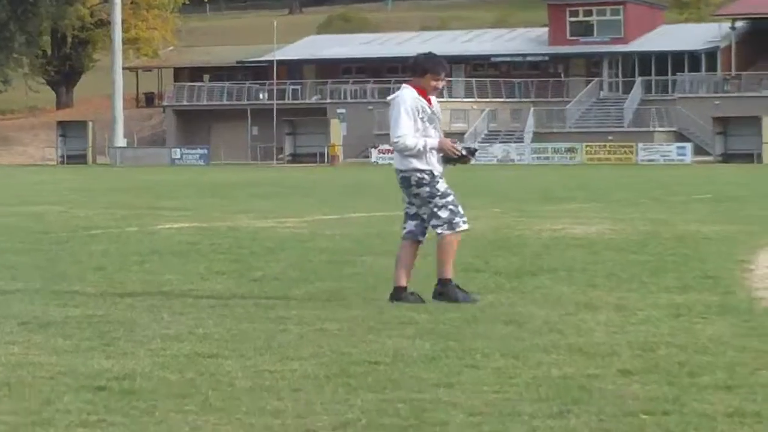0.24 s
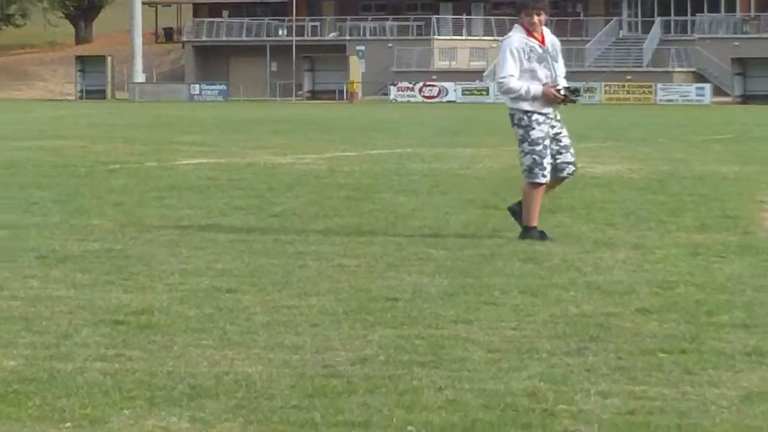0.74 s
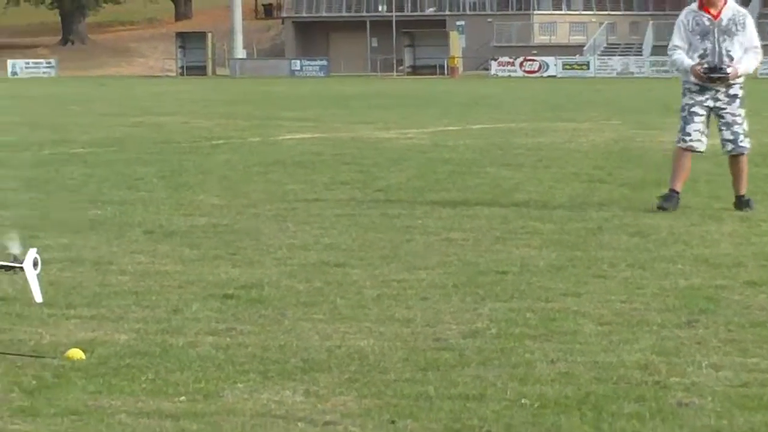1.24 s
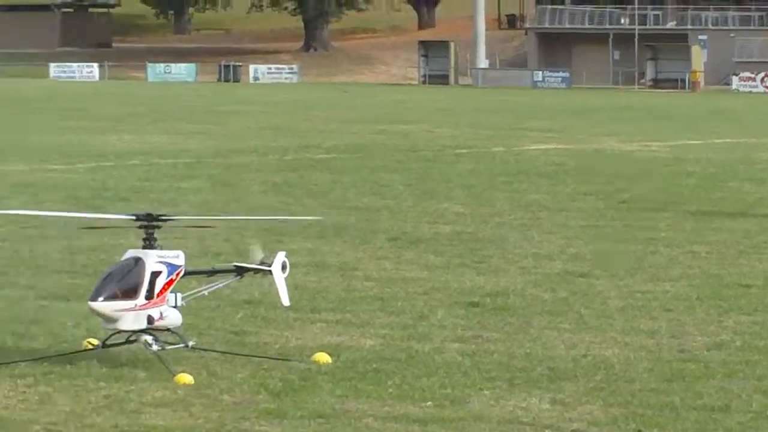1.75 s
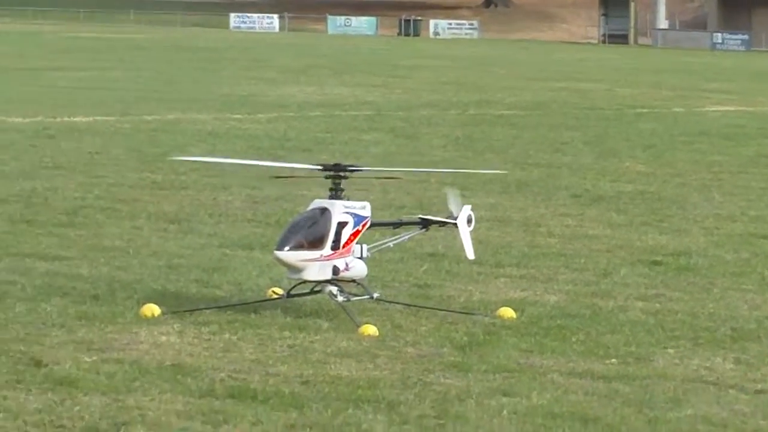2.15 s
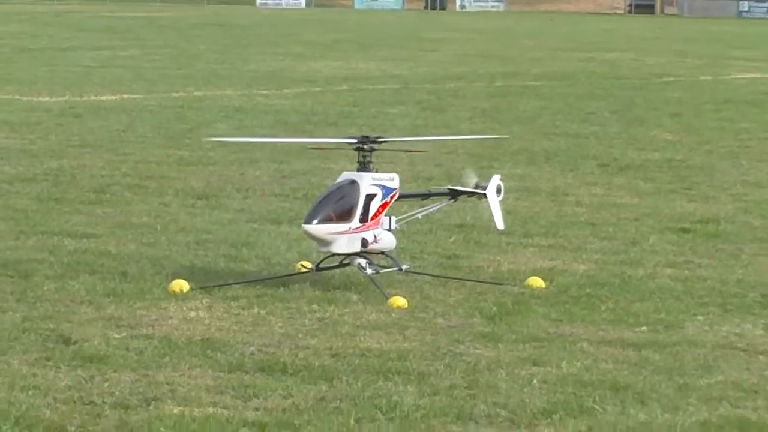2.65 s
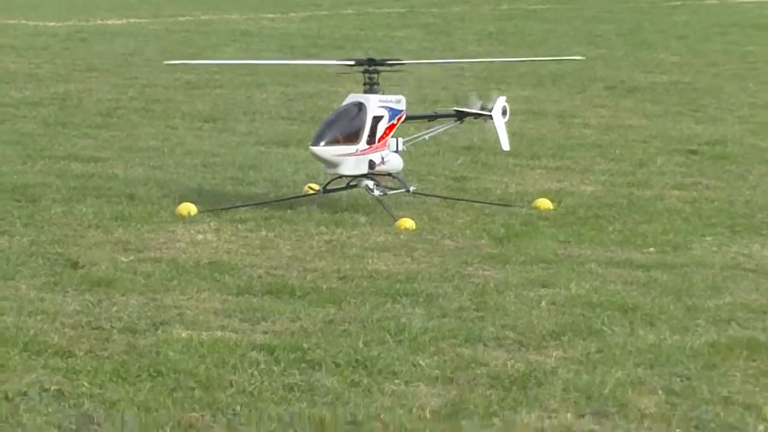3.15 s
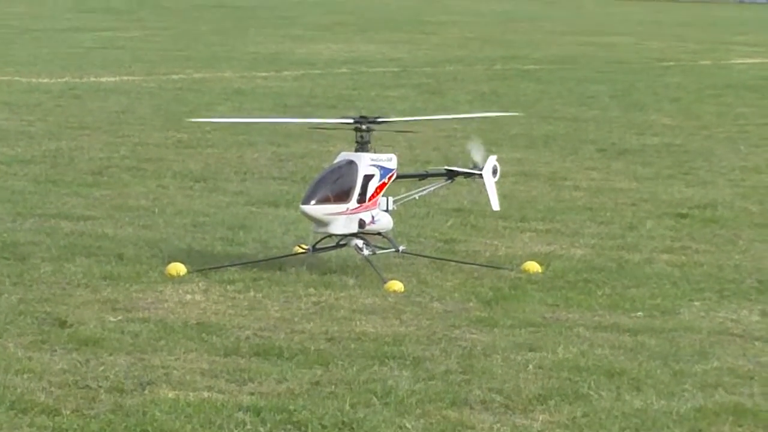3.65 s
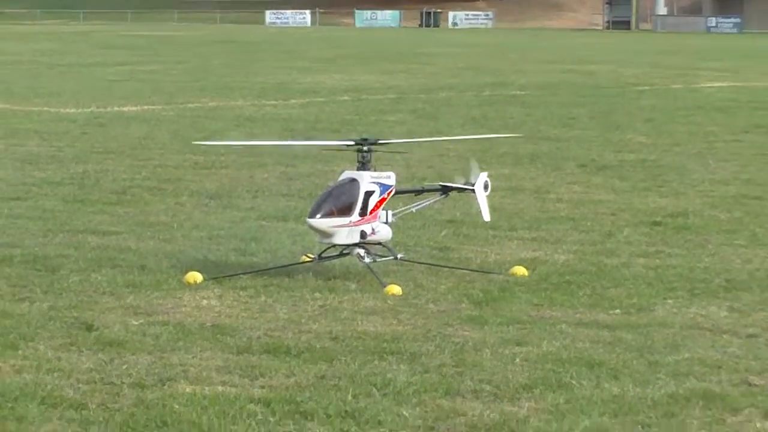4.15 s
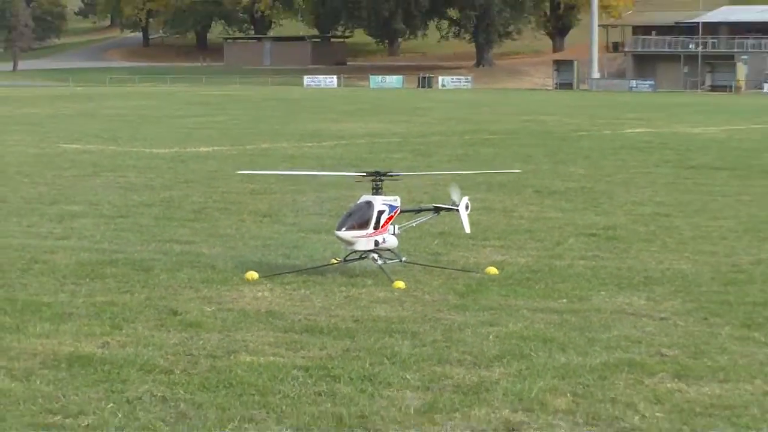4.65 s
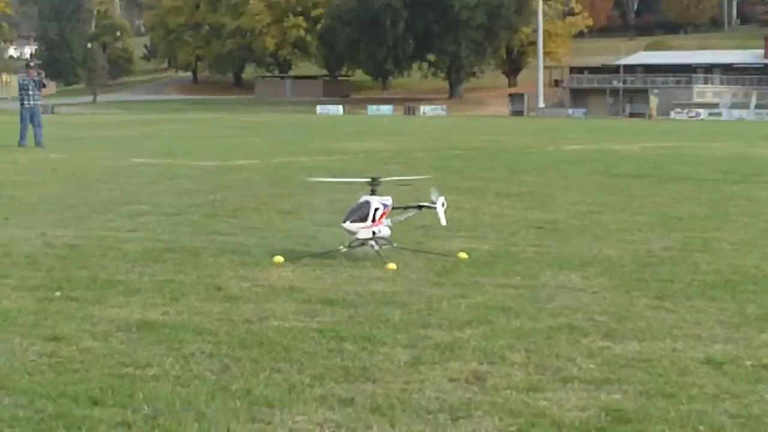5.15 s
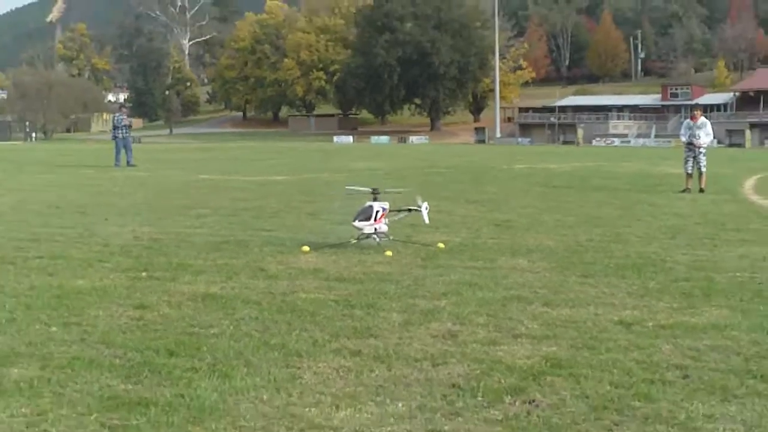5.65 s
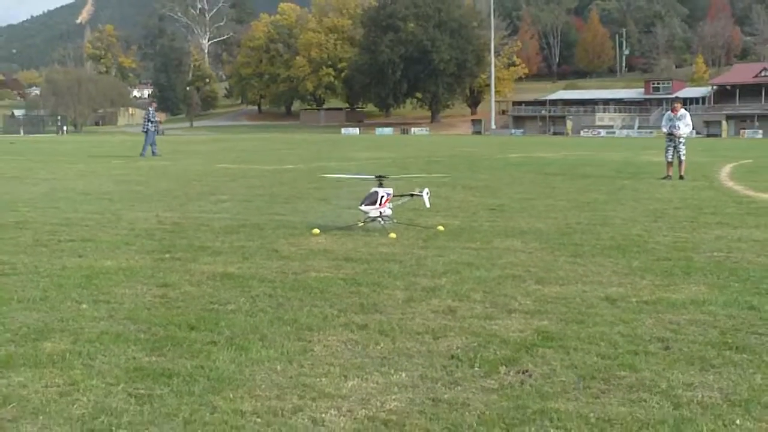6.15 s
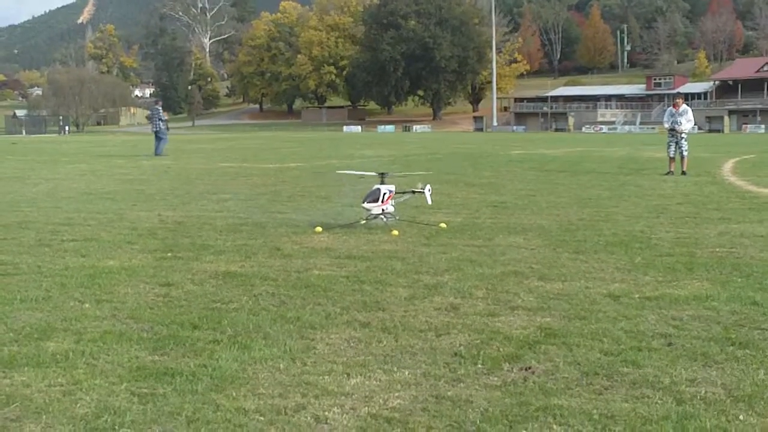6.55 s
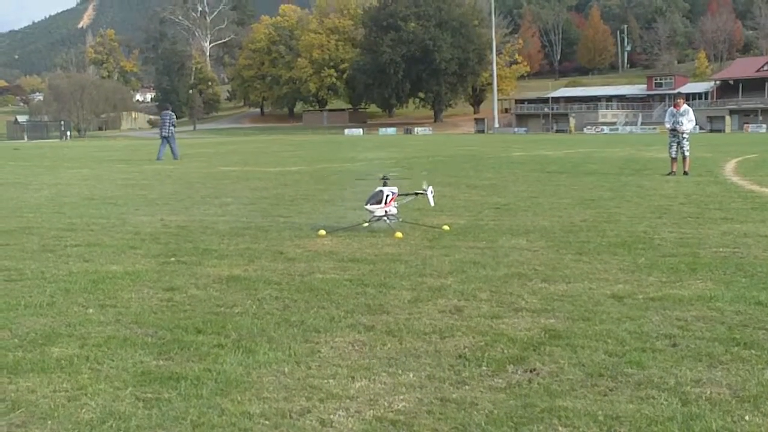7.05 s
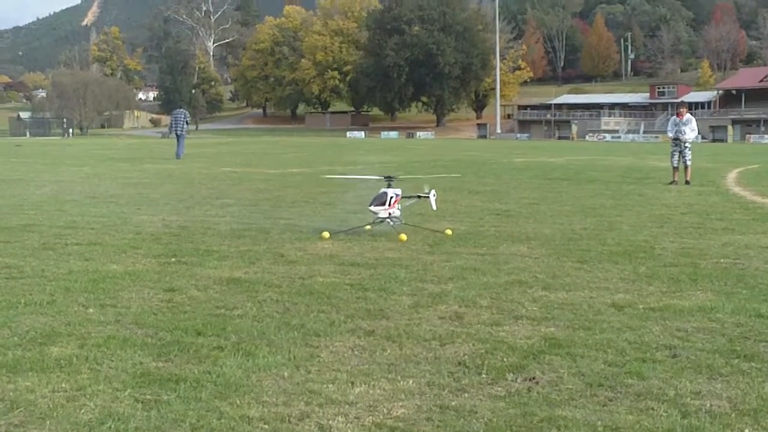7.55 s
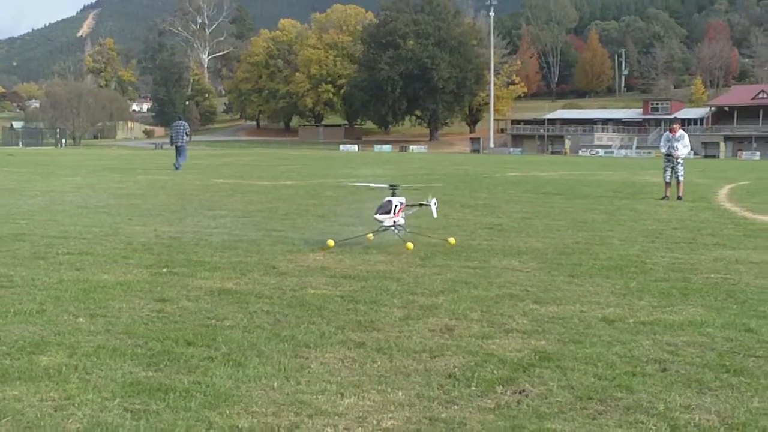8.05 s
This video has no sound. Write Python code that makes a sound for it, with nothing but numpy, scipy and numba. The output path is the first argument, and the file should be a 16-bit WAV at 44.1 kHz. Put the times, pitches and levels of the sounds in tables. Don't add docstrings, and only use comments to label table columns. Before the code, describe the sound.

Steady airy rotor hiss and fluttering blade swishes, about thirty-six a second, cover a thin two-stroke whine. Soft shoe scuffs come first, with tiny grass ticks around three seconds and a very faint distant bird note near four. The engine then gathers speed, a sharp twig snap pops late, and the whine keeps climbing. Dry outdoor field, close mono sound, narrow treble and slightly grainy compression.

```python
import sys
import numpy as np
from scipy import signal
from scipy.fft import rfft, irfft
from scipy.io import wavfile
from scipy.ndimage import uniform_filter1d, map_coordinates
from numba import njit

SR = 44100
rng = np.random.default_rng(int(sys.argv[2]) if len(sys.argv) > 2 else 0)


def to_linear_factor(level_db):
    exponent = np.asarray(level_db, float) / 20
    return 10 ** exponent


def unload_wav(signal):
    wavfile.write(
        sys.argv[1],
        SR,
        np.round(np.clip(np.atleast_2d(signal).T, -1, 1) * 32767).astype(np.int16),
    )


N = 366030
T = np.arange(N) / SR
F = np.arange(N // 2 + 1) * SR / N + 1


def curves(table):
    s, *columns = np.transpose(table)
    return [np.interp(T, s, c) for c in columns]


def unit(x):
    return x / np.sqrt(np.mean(x ** 2))


def walk(rate_hz):
    k = max(int(SR / 32 / rate_hz), 1)
    coarse = rng.standard_normal(N // 32 + 2)
    coarse = uniform_filter1d(uniform_filter1d(coarse, k), k)
    return np.interp(np.arange(N) / 32, np.arange(len(coarse)), unit(coarse))


@njit
def svf(x, hz, width_hz):
    y, b, l = np.empty(len(x)), 0., 0.
    for i in range(len(x)):
        g, k = np.tan(np.pi * hz[i] / SR), width_hz / hz[i]
        v = (b + g * (x[i] - l)) / (1 + g * (g + k))
        b, l, y[i] = 2 * v - b, l + 2 * g * v, k * v
    return y


def band_noise(x, hz, width_hz):
    return unit(svf(svf(x, hz, width_hz), hz, width_hz))


# start_s [s], throttle [0-1], level_db [dB]
THROTTLE = [(0, 0.2, -47.5), (1, .2, -49), (2, 0.1, -47.5), (3, 0.1, -49), (3.6, .25, -45), (4.5, .41, -41),
            (5.4, 0.6, -39.5), (6.2, 0.5, -39.5), (6.8, .7, -38.5), (7.4, 0.86, -38), (7.9, 0.8, -36),
            (8.3, 0.94, -32.5)]


def engine_load():
    return curves(THROTTLE)


# start_s [s], crank_hz [Hz]
CRANK_SPEED = [(0.0, 179.85), (0.6, 176.9), (1.2, 174.55), (1.8, 172.7), (2.4, 171.45), (3.0, 170.95),
               (3.6, 171.5), (4.0, 175.6), (4.2, 176.9), (5.0, 180.4), (5.4, 181.95), (5.8, 184.35),
               (6.0, 184.56), (6.4, 184.0), (6.6, 184.57), (7.2, 189.25), (7.8, 195.45), (8.3, 199.3)]


def rotation():
    pinion_teeth, gear_teeth, rotor_start_turns = 9, 88, -.031
    hunt_turns = .006
    hz = curves(CRANK_SPEED)[0]
    steady = np.cumsum(hz) / SR
    rotor = steady * pinion_teeth / gear_teeth + rotor_start_turns
    return hz, steady + hunt_turns * walk(14.), rotor


# time_s [s], level_db [dB], length_s [s], pitch_hz [Hz], width_hz [Hz]
GRASS_SCUFFS = [(0.031, -35.5, 0.032, 1490, 730), (0.264, -39.5, 0.055, 1410, 697),
                (0.351, -29.5, 0.049, 1510, 790), (0.354, -26.5, 0.03, 2730, 1620),
                (0.452, -36, 0.017, 1430, 700), (2.82, -39, 0.036, 1460, 690),
                (3.016, -33, 0.005, 1560, 400), (3.028, -31, 0.003, 1450, 600),
                (3.075, -36, 0.02, 1550, 400), (5.742, -25, 0.0035, 1650, 1100),
                (5.753, -30, 0.005, 2500, 1200), (5.79, -35, 0.008, 1400, 500)]
# time_s [s], level_db [dB], length_s [s], pitch_hz [Hz]
TWIG_SNAP = (5.7452, -4.5, .00032, 2450)
# time_s [s], length_s [s], pitch_hz [Hz], level_db [dB]
BIRD_NOTE = (4.115, .035, 1180, -42)


def field():
    out = np.zeros(N)
    grain = rng.standard_normal(N) * to_linear_factor(2.5 * walk(250.))
    for s, db, length, hz, width_hz in GRASS_SCUFFS:
        start, stop = int((s - 4 * length) * SR), int((s + 4 * length) * SR)
        near = slice(max(start, 0), stop)
        band = band_noise(grain[near], np.full(N, 1. * hz), 1. * width_hz)
        out[near] += to_linear_factor(db) * np.exp(-((T[near] - s) / length) ** 2) * band
    s, db, length, hz = TWIG_SNAP
    out -= to_linear_factor(db) * np.exp(-((T - s) / length) ** 2) * np.sin(2 * np.pi * hz * (T - s))
    s, length, hz, db = BIRD_NOTE
    return out + to_linear_factor(db) * np.exp(-((T - s) / length) ** 4) * np.sin(2 * np.pi * hz * T)


def clatter(turns, repeat):
    size = 256
    cycles = rng.standard_normal((int(turns[-1]) + 3, size))
    turn_to_turn = np.convolve([1, -repeat], [1, -.88])
    cycles = signal.lfilter([1, -1], turn_to_turn, cycles, axis=0).ravel()
    burst = 1 + .25 * np.cos(2 * np.pi * turns)
    return unit(burst * map_coordinates(cycles, [(turns + 1) * size], order=2))


# pitch_hz [Hz], density_db [dB per Hz]
HISS_COLOUR = [(60, -81), (150, -45.5), (300, -41), (500, -24), (900, -23), (1500, -14.5), (2100, -12.5),
               (2600, -10), (3300, -1.5), (4000, -7), (5000, -4.5), (6200, -6), (7000, -9), (7600, -21.5)]


def gas_hiss(turns):
    throttle = engine_load()[0]
    pitch_hz, density_db = np.transpose(HISS_COLOUR)
    colour = to_linear_factor(np.interp(np.log(F), np.log(pitch_hz), density_db, left=-90, right=-90))
    engine_share = np.interp(F, (400, 900, 1400, 2800, 5500), (.3, .9, .95, .85, .15))
    engine = rfft(to_linear_factor(-2 + 3 * throttle ** 2) * clatter(turns, .55))
    flow = rfft(rng.standard_normal(N))
    mix = np.sqrt(engine_share) * engine + np.sqrt(1 - engine_share) * flow
    return unit(irfft(mix * colour, N)) * to_linear_factor(.25 * walk(9.))


# start_s [s], swish_db [dB], whoosh_db [dB], lead [-1..1]
BLADE_BITE = [(0, 1, -1, .6), (.6, -6, -8, 0.35), (1.0, -1, -5, 0.46), (1.6, -4, -1.5, .65),
              (2.2, -6, -4, .55), (2.8, -1.5, -4, 0.49), (3.4, -2, -5, 0.41), (4, 3.5, -9, .3),
              (4.8, 2.5, -10, 0.3), (5.4, 4.5, -8.5, -0.066), (5.9, 2.5, -8, -.15), (6.4, 5.5, -8, -.3),
              (7, 2, -13, -.6), (7.6, 3.5, -14, -.75), (8.3, 1, -13.5, -0.82)]


def blades(hz, rotor):
    swish_db, whoosh_db, lead = curves(BLADE_BITE)
    swish_turns, whoosh_turns, glide = .11, .09, .4
    from_pass = (2 * rotor + .5) % 1 / 2 - .25
    pass_number = np.floor(2 * rotor + .5).astype(int)
    size = to_linear_factor(.9 * rng.standard_normal(400))[pass_number]
    blade = np.clip(1 + lead * np.cos(2 * np.pi * rotor), 0, 3) * size

    centre_hz = (2400 + 20 * hz) * (1 + glide * from_pass)
    swish = band_noise(rng.standard_normal(N), centre_hz, 340.)
    swish = swish * np.exp(-(from_pass / swish_turns) ** 2) * blade

    whoosh = band_noise(rng.standard_normal(N), np.full(N, 6054.), 1300.)
    whoosh = whoosh * np.exp(-(from_pass / whoosh_turns) ** 2) * blade

    tail = np.exp(-(rotor % .5) / .13)
    tail = tail * np.clip(1 + lead * np.sign(np.sin(2 * np.pi * rotor)), 0, 3)
    wake = band_noise(rng.standard_normal(N), 31 * hz, 900.)
    wake = to_linear_factor(-5) * uniform_filter1d(tail, size=200) * wake
    return to_linear_factor(whoosh_db) * whoosh + to_linear_factor(swish_db - 3.5) * (swish + wake)


def air(hz, turns, rotor):
    db = -22.5 + 2.67 * engine_load()[0]
    return to_linear_factor(db + 0.13) * (gas_hiss(turns) + blades(hz, rotor))


# pitch_hz [Hz], width_hz [Hz], idle_db [dB], full_throttle_db [dB]
ECHO_DIPS = [(706, 670, 1.5, -1.5), (1007, 62, 0, -3), (1114, 100, -2.5, -1.5), (1390, 60, -1, -2.5),
             (1989, 72, -4.5, -7.5), (2414, 80, -3, -3), (2950, 130, -2, -2), (3800, 92, -3, -2.5),
             (3890, 120, -1, 2.5), (4700, 130, 2.5, -6), (4910, 130, -2, -3), (5430, 200, 0, 3.5),
             (6054, 550, -1.5, 0), (6406, 180, 4, -2.5)]


def ground_echo(wind):
    spectrum = rfft(wind)

    def reflected(column):
        db = sum(row[column] * np.exp(-((F - row[0]) / row[1]) ** 2) for row in ECHO_DIPS)
        return irfft(spectrum * to_linear_factor(db), N)

    throttle = np.clip(engine_load()[0], 0, 1)
    idle, full = reflected(2), reflected(3)
    return idle + throttle * (full - idle)


# pitch_hz [Hz], width_hz [Hz], idle_db [dB], full_throttle_db [dB]
BODY_RESONANCES = [(376.6, 16.7, 11, 10.5), (1012, 24, -17.5, -15), (1567, 36, -2, 14), (1761, 34, 9, 8),
                   (1839, 45, 3.5, 10.5), (1957, 22, -4, -25.5), (2390, 66, -7, -8), (3307, 33, -3.5, 8),
                   (3470, 80, -2, 2), (5550, 210, 10, 17.5)]


def body_db(hz):
    coarse_hz, throttle = hz[::64], engine_load()[0][::64]
    db = 0
    for centre_hz, width_hz, idle_db, full_db in BODY_RESONANCES:
        peak_db = idle_db + throttle * (full_db - idle_db)
        db = db + peak_db * np.exp(-((coarse_hz - centre_hz) / width_hz) ** 2)
    return np.interp(T, T[::64], db)


# crank_order [per turn], lift_db [dB]
PART_THROTTLE_LIFT = [(1, -3), (2, -4.5), (4, -.5), (5, -0.5), (6, 0), (7, 0), (8, 2), (9, -2), (10, -1),
                      (11, 0), (12, 1), (13, 2.5), (14, 1), (15, -1.5), (16, 1.5), (17, 1.5), (18, -5),
                      (19, 3), (20, .6), (21, -1.7), (22, .6), (23, 0.3), (24, 4.8), (28, 2.8)]


def part_db(order):
    middle, span = .44, .13
    nearness = np.exp(-((engine_load()[0] - middle) / span) ** 2)
    return dict(PART_THROTTLE_LIFT).get(order, 0) * nearness


def partial(turns, order, rough, rate_hz, throb=1):
    wobble = 1 + rough * walk(rate_hz) + 1j * rough * walk(rate_hz)
    return np.sqrt(2) * (wobble * throb * np.exp(2j * np.pi * order * turns)).imag


WHINE_CRANK_ORDERS = (9, 18, 19, 28)
# idle_db [dB], rise_db [dB to full throttle], fading_db [dB]
WHINE_LEVELS = [
    (-47, 12.5, -0.7),
    (-38, 6, 0.3),
    (-43, 2.5, 0.2),
    (-50, 5.5, 0.7),
]
GEAR_RUN_OUT = [
    (.6, .17, .5, .78, 0),
    (.55, .2, .7, .3, .17),
    (.3, .3, .6, .3, .1),
    (.4, .5, .3, .52, 0),
]
# start_s [s], mesh_db [dB], octave_db [dB], fan_db [dB], ring_db [dB]
CLUTCH_LOAD = [(0, 1.5, 2.5, -2, -0.5), (.6, -4, -1, -1, -7), (1.2, -3, 2, -3.5, 0.5),
               (2, .6, -2.8, -1.2, 2.3), (2.8, -3, -4.5, 3.5, 3.5), (3.4, 1, -4, -1.5, -2.5),
               (3.9, 0, 3, -3, -3.5), (4.4, 3, 5.5, 3, 2), (4.9, -0.7, 2.1, 0, 0), (5.4, -0.7, 0.5, 4, 3),
               (5.9, -2, 4.5, 1.5, 3), (6.4, -5, 1.7, -1.5, -5.5), (6.85, 1, 1.5, 2, 4.5),
               (7.1, 2, -6.5, -0.5, -5), (7.35, -0.1, 1.5, -6, -1), (7.75, 1, 3.5, 1, 2.5),
               (7.95, 0, -1.5, 3, -0.8), (8.3, -3.5, -2, 0.2, 3)]


def gears(hz, turns, rotor):
    throttle, out = engine_load()[0], 0
    loads_db = curves(CLUTCH_LOAD)
    roughs, rates_hz, trims_db = (.22, .28, .33, 1.2), (130., 110., 130., 260.), (-1, -1.5, -1.4, -8)
    for i, order in enumerate(WHINE_CRANK_ORDERS):
        idle_db, rise_db, fade_db = WHINE_LEVELS[i]
        idle, full, fall, peak, lag = GEAR_RUN_OUT[i]
        sidebands = 0
        for k in (1, 2, 3):
            phase_turns = k * (rotor - peak) + lag * k * (k - 1)
            sidebands = sidebands + fall ** (k - 1) * np.exp(2j * np.pi * phase_turns)
        throb = 1 + (idle + throttle * (full - idle)) * sidebands
        db = idle_db + rise_db * throttle + fade_db * walk(5.0)
        db = db + body_db(order * hz) + part_db(order) + trims_db[i] + loads_db[i]
        out = out + to_linear_factor(db) * partial(turns, order, roughs[i], rates_hz[i], throb)
    return out


# crank_order [per turn], level_db [dB]
LIGHT_TIMBRE = [(1, -17.5), (2, -10), (3, -11), (4, -2.5), (5, 2), (6, -4), (7, -8.5), (8, -29.5), (9, -7),
                (10, -6.5), (11, -27), (12, -9), (13, -8), (14, -25.5), (15, -2.5), (16, -2.5), (17, -18),
                (18, 0), (19, -1), (20, 1), (21, -18.5), (22, -20.5), (23, -7.5), (24, 7)]
# crank_order [per turn], level_db [dB]
HEAVY_TIMBRE = [(1, -27), (2, -22), (3, -11), (4, -11), (5, -13.5), (6, -14.5), (7, -25), (8, -14.5),
                (9, -1), (10, -10.5), (11, -10), (12, -11), (13, -24), (14, -13.5), (15, -12), (16, -13.5),
                (17, -8.5), (18, 0), (19, -7), (20, -12.5), (21, -6.5), (22, -11), (23, -11), (24, -22)]
# start_s [s], level_db [dB]
THIRD_ORDER = [(0, -48), (.8, -48.5), (1.3, -55), (1.85, -66), (2.3, -55.5), (2.85, -47), (3.4, -53),
               (3.9, -64.5), (4.5, -70), (5.4, -71.5), (6, -54.5), (6.5, -60.5), (7, -45), (7.5, -40.5),
               (8.3, -46.5)]


def exhaust(hz, turns):
    throttle, exhaust_db = engine_load()
    spread_turns = .02
    out = 0
    for (order, light_db), (_, heavy_db) in zip(LIGHT_TIMBRE, HEAVY_TIMBRE):
        if order in WHINE_CRANK_ORDERS:
            continue
        rough = min(.003 * order ** 2 + .02, .8)
        tone = partial(turns - spread_turns * order, order, rough, 40.0 + 4.7 * order)
        db = exhaust_db + light_db + throttle * (heavy_db - light_db)
        db = db + body_db(order * hz) + part_db(order)
        if order == 3:
            db = curves(THIRD_ORDER)[0]
        out = out + to_linear_factor(db) * tone / np.hypot(1, rough)
    return out


def scene():
    hz, turns, rotor = rotation()
    blown = ground_echo(air(hz, turns, rotor))
    mono = field() + blown + gears(hz, turns, rotor) + exhaust(hz, turns)
    return np.tile(mono, (2, 1))


def camera_thinning(x, step_db, band_db, top_db):
    size, used = 1152, 400
    k, n = np.arange(used) + .5, np.arange(2 * size) + .5
    window = np.sin(np.pi * n / 2 / size)[:, None]
    basis = window * np.cos(np.pi / size * np.outer(n + size / 2, k)) * np.sqrt(2 / size)
    count = N // size + 2
    padded = np.pad(x, (size, (count + 1) * size - N))
    frames = np.lib.stride_tricks.sliding_window_view(padded, 2 * size)[::size][:count]
    lines = frames @ basis
    hz = k * SR / 2 / size

    mask = np.sqrt(uniform_filter1d(lines ** 2, 88, axis=1) + 1e-18)
    mask[:, hz > 6300] = mask[:, [np.searchsorted(hz, 6300)]]
    thrift_db = 1.1 * rng.standard_normal((count, 1))
    bass_db = np.minimum(hz - 2300, 0) / 170 + np.minimum(hz - 1350, 0) / 200
    bass_db = bass_db + np.minimum(hz - 850, 0) / 30
    step = mask * to_linear_factor(step_db + thrift_db + bass_db)
    rounded = np.sign(lines) * np.floor((abs(lines) / step) ** .75 + .4) ** (4 / 3) * step

    band = np.repeat((lines ** 2).reshape(count, -1, 5).mean(2), 5, axis=1)
    floor = step * to_linear_factor(np.where(hz < 6800, band_db, top_db))
    rounded = rounded * (band > floor ** 2)

    frames = rounded @ basis.T
    gap = np.zeros(size)
    out = np.append(frames[:, :size].ravel(), gap) + np.append(gap, frames[:, size:].ravel())
    return out[size:size + N]


def roll_off(x):
    return signal.sosfilt(signal.butter(12, 7880, fs=SR, output="sos"), x)


def record(dry):
    mono = camera_thinning(dry[0], step_db=1.5, band_db=-7, top_db=-8.5)
    return roll_off(np.tile(mono, (2, 1)))


dry = scene()
out = record(dry)
unload_wav(out)
```